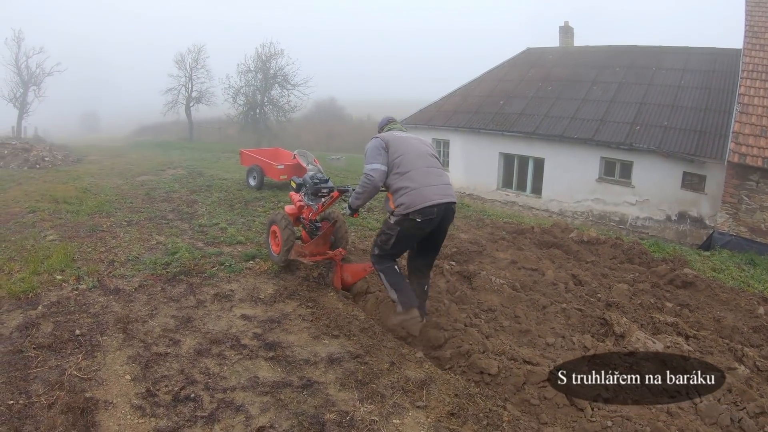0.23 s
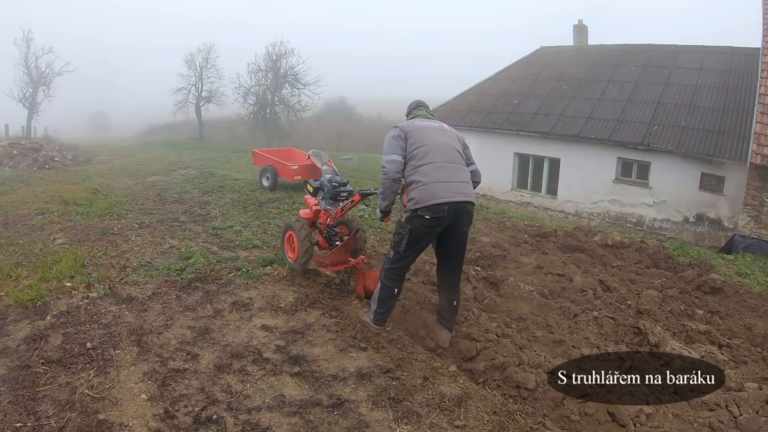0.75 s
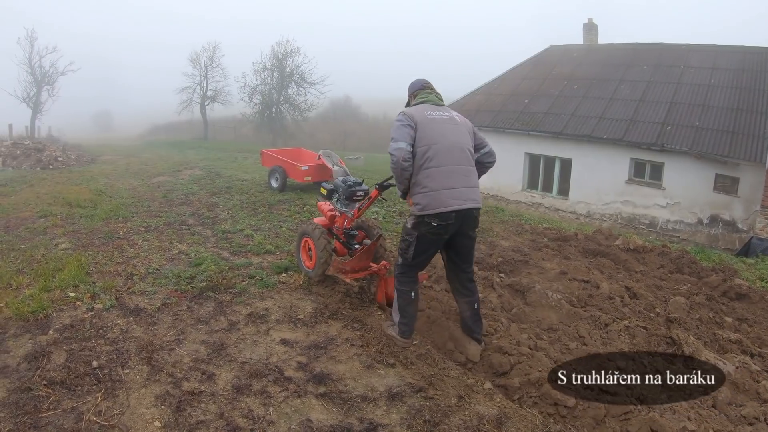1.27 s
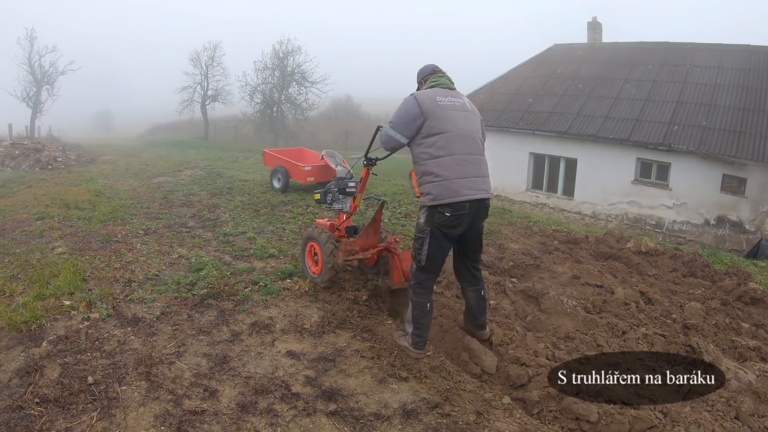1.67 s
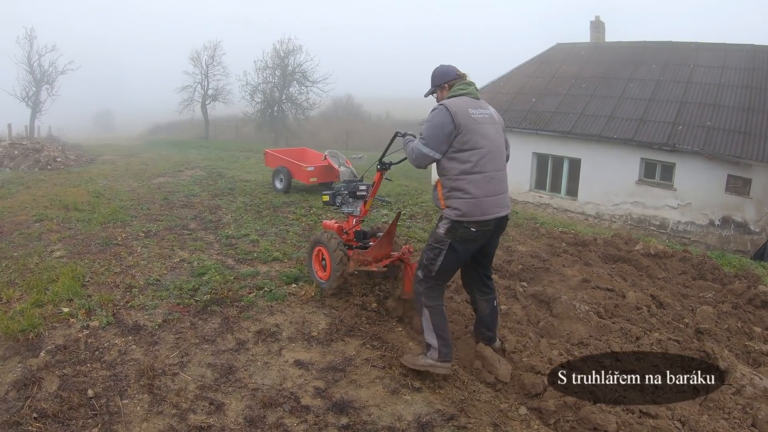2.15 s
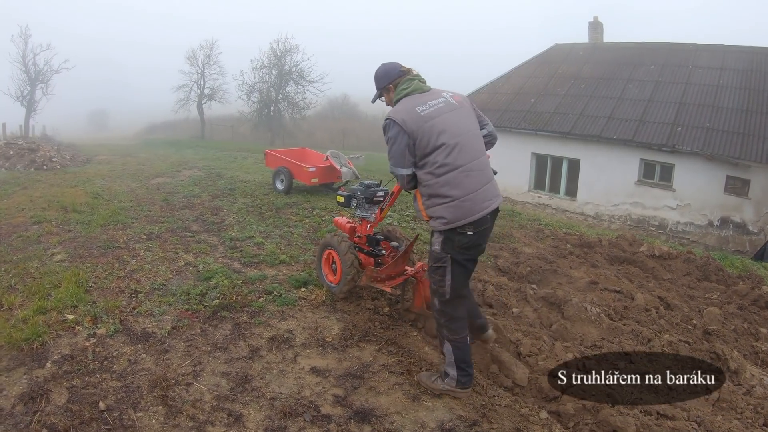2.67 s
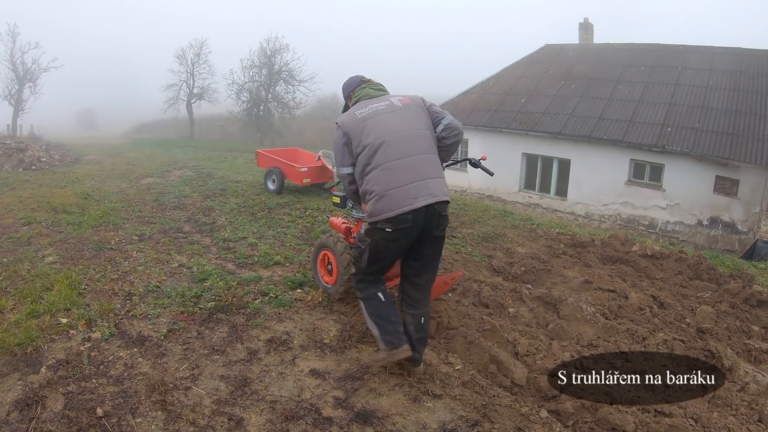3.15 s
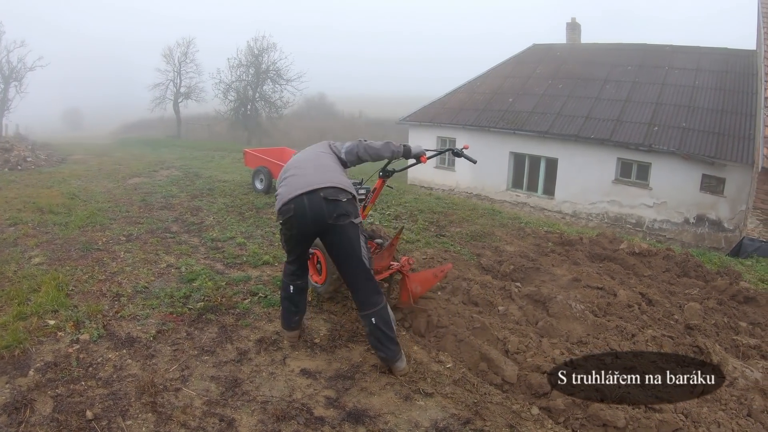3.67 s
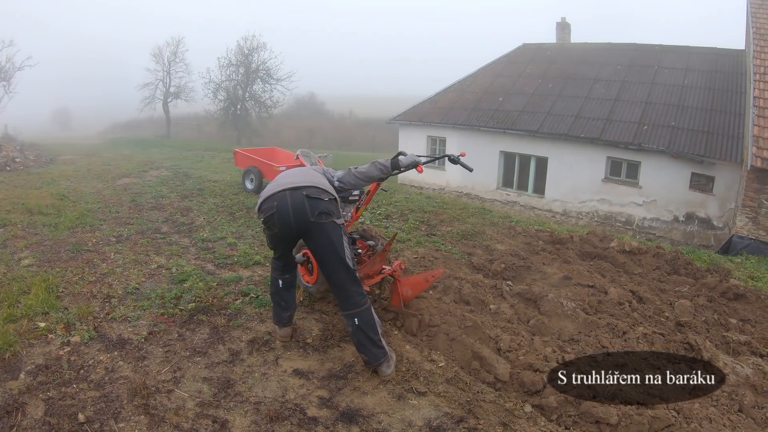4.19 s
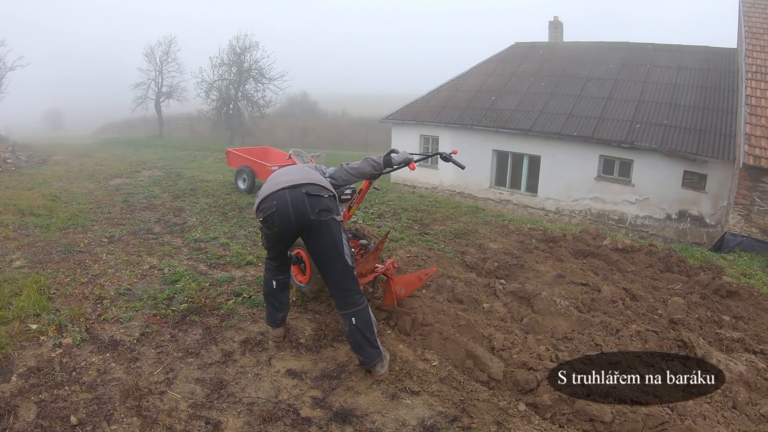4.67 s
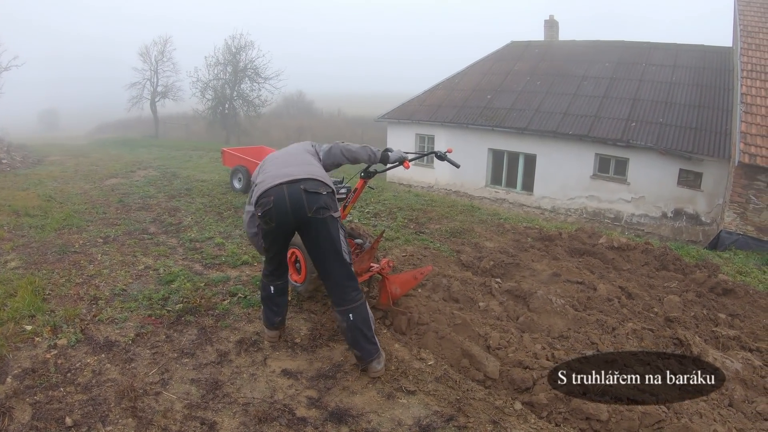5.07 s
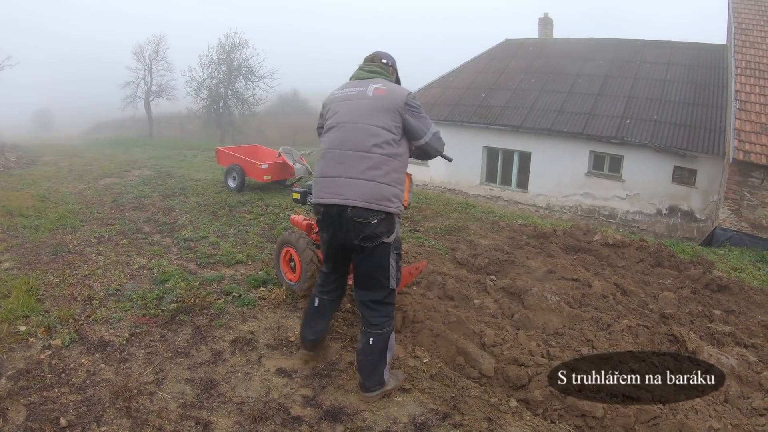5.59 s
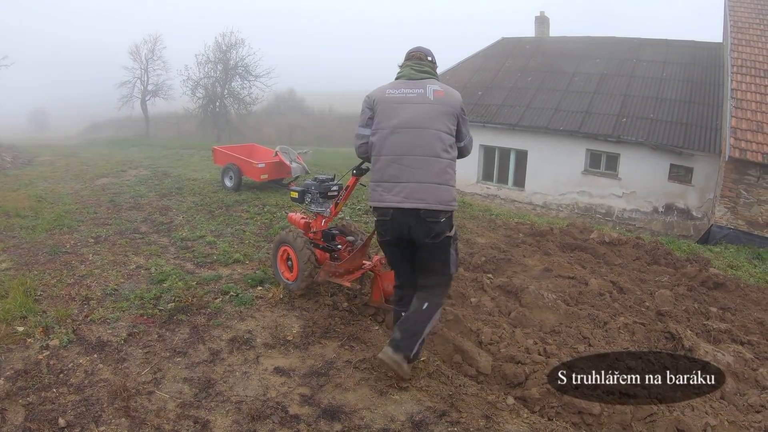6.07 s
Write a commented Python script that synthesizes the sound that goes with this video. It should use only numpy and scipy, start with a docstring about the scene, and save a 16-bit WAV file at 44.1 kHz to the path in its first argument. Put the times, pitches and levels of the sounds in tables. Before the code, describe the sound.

A one-cylinder walking tractor runs a few metres away in an open field, centred in front of the microphone. It starts loud, pulling hard with a barking intake. At about 0.6 seconds the throttle snaps shut and the engine coasts down, reaching a chugging idle soon after 1 second. From roughly 0.9 to 1.6 seconds loose steel rattles, stones tick and the plough scrapes briefly through gritty soil. A loose cover clacks quickly from 1.8 to 3 seconds, then more faintly and sporadically. The idle continues to the end, with exhaust thumps, rhythmic hiss and mechanical knocking. Between 3 and 6 seconds the knock and hiss are muffled while the low thump stays, with two small dry ticks around 4 and 4.5 seconds. The engine brightens again near 6 seconds. Light wind rumbles on the microphone throughout in small gusts.

```python
"""A one-cylinder four-stroke walking tractor, a few metres from a stereo microphone in a field.
It opens pulling hard, the intake barking; at 0.6 s the throttle snaps shut and the engine coasts down.
From about 1 s loose steel rattles and the ploughshare scrapes the soil, then a cover starts to clack.
The engine chugs on at idle: each cycle the pipes thump, gas hisses out and the valve gear knocks.
From 3 s to 6 s the operator screens the knock and hiss. Light wind rumbles on the microphone throughout."""
import sys
import numpy as np
from scipy import signal
from scipy.fft import rfft, irfft
from scipy.io import wavfile

SR = 44100
rng = np.random.default_rng(int(sys.argv[2]) if len(sys.argv) > 2 else 0)


def pcm_store(signal):
    """Save signal as 16-bit PCM."""
    levels = np.round(np.clip(np.atleast_2d(signal), -1, 1) * 32767)
    wavfile.write(sys.argv[1], SR, levels.astype(np.int16).T)


N = 279594
TIME = np.arange(N) / SR

# The crankshaft. Each row: time in seconds, speed in revolutions per minute.
CRANK_SPEED = [(0, 3069.8), (.2, 3024.7), (.37, 3300), (.58, 3358.3), (.63, 2925.8), (.74, 2928.7),
               (.9, 2030.9), (.96, 2053.7), (1.51, 1845.6), (2.04, 1717.1), (2.09, 1714.2), (2.67, 1745.6),
               (3.01, 1783.6), (3.29, 1763), (3.97, 1662.1), (5.13, 1660.8), (5.68, 1672.2), (5.81, 1604.2),
               (6.4, 1632.7)]
def firings():
    """Firing times in seconds, one every two crank turns, with two spare at each end."""
    cycles = np.cumsum(in_time(CRANK_SPEED)[0]) / (120 * SR) - .169   # first firing .169 of a cycle in
    t = np.interp(np.arange(int(cycles[-1]) + 1), cycles, TIME)
    before = t[0] - (t[1] - t[0]) * np.array([2, 1])
    after = t[-1] + (t[-1] - t[-2]) * np.array([1, 2])
    return np.r_[before, t, after]

# The throttle. Each row: time in seconds, opening from 0 to 1.
THROTTLE = [(0, 1), (.6, 1), (.66, .35), (.78, .02), (6.34, .02)]
# Pull on the plough, and the engine turned from the microphone behind the operator.
# Each row: time in seconds, change in dB before weighting.
EFFORT = [(0, -7), (.13, -5), (.25, -3), (.36, -1), (.47, -3.3), (.6, -5)]
SCREENING = [(0, 1), (2.0, 0.5), (2.9, -1), (3.12, -8.5), (3.35, -6.5), (3.8, -4), (4.1, -5.5), (5.55, -9),
             (5.85, -4), (6.1, -3), (6.34, -0.5)]
def loudness(law):
    """Gain of one engine layer, following speed, throttle, effort and screening."""
    # Each law: idle level in dB, dB per doubling of speed, dB at open throttle, then two weights.
    idle_db, doubling_db, throttle_db, effort_weight, screen_weight = law
    speed_db = doubling_db * np.log2(in_time(CRANK_SPEED)[0] / 1700)   # idle is 1700 rpm
    load_db = in_time(THROTTLE)[0] * (throttle_db + effort_weight * in_time(EFFORT)[0])
    return amp(idle_db + speed_db + load_db + screen_weight * in_time(SCREENING)[0])

# Valve puffs in the pipes. Each row: place in the cycle from 0 to 1, delay in ms, resonance in Hz,
# swell time in ms, relative level in dB, push (+) or suck (-), scatter in dB.
EXHAUST_IDLE = [(0, .5, 134, 2.3, 17.5, 1, .7)]
INTAKE_IDLE = [(.283, -3.7, 65, 2.6, 11.5, -1, .7), (.283, .4, 145, 2.3, 7, -1, 1),
               (.69, -.3, 111, 2.9, 1, 1, 1.5)]
SILENCER_RING = [(0, -.8, 525, 2.3, 12, 1, 2), (0, .3, 601, 2.4, 10.5, 1, 2)]
PIPES_LOAD = [(0, -.8, 106, 2, 17, 1, .4), (.25, 0, 94, 1.8, 16, -1, .4), (.585, 0, 173, 1.2, 10, 1, .7)]
INTAKE_BARK = [(.212, 0, 465, 1.3, 19, 1, .6), (.38, 0, 703, 1.2, 8, 1, 1), (.585, 0, 373, 1, 16.5, 1, .8),
               (.865, 0, 583, 1.9, 6.5, 1, 1)]
COAST_PUFF = [(0.0032, -0.8, 61, 2.1, 21.3, 0.86, .7)]
# Uneven firings. Each row: time in seconds, change of strength in dB.
UNEVEN_FIRINGS = [(.731, 2), (.772, -1.5), (.819, -3), (.87, -0.5), (.928, -4), (3.388, -4), (4.745, -3),
                  (5.323, -7.5), (5.756, -7)]
# Throttle snapped shut, nothing firing. Each row: time in seconds, share of coasting from 0 to 1.
COASTING = [(0, 0), (.625, 0), (.64, 1), (.71, 1), (.76, 0), (6.34, 0)]
# Level laws, as read by loudness().
THUMP_LAW = (-33, 0.6, 7, 0.26, -0.01)
RING_LAW = (-44.5, 1, 10, .1, -0.26)
BARK_LAW = (-55, 3, 19.5, 1.3, 0)
def pipes(fire, opening):
    """Exhaust and intake bark under load, pump unburnt air while coasting and thump at idle."""
    uneven_db, even_db = np.zeros((2, len(fire)))
    for s, db in UNEVEN_FIRINGS:
        uneven_db[np.argmin(abs(fire - s))] = db
    thump = loudness(THUMP_LAW)
    idle = thump * (puffs(fire, EXHAUST_IDLE, uneven_db) + puffs(fire, INTAKE_IDLE, even_db))
    idle += loudness(RING_LAW) * puffs(fire, SILENCER_RING, .58 * uneven_db)
    load = thump * puffs(fire, PIPES_LOAD, even_db)
    load += loudness(BARK_LAW) * puffs(fire, INTAKE_BARK, even_db) + growl(fire)
    pumped = thump * puffs(fire, COAST_PUFF, even_db)
    coasting = in_time(COASTING)[0]
    return (1 - coasting) * (opening * load + (1 - opening) * idle) + coasting * pumped

def puffs(fire, table, strength_db):
    """Each valve opening swells and dies in one pipe resonance."""
    out = 0
    for share, delay_ms, hz, swell_ms, level_db, sign, scatter_db in table:
        age, cycle = since(fire, share, delay_ms)
        level_luck, pitch_luck = rng.standard_normal((len(fire), 2))[cycle].T
        swell = age * 1000 / swell_ms
        gain = sign * amp(level_db + strength_db[cycle] + scatter_db * level_luck)
        tone = np.sin(2 * np.pi * hz * (1 + .012 * pitch_luck) * age)
        out += gain * swell ** 2 * np.exp(-swell) * tone
    return out

# Modes of the long pipe. Each row: pitch in Hz, width in Hz, relative level in dB.
PIPE_MODES = [(342, 11, 0.5), (422.4, 12, 2), (498, 27, -1), (584, 19, -3), (721, 12, -6)]
GROWL_LAW = (-57, 3, 25.5, 1, 0)
def growl(fire):
    """One sharp blow, about 8 ms after each firing, sets the long pipe ringing."""
    blows = np.zeros(N)
    at = fire[(fire > 0) & (fire < TIME[-1])] + .00813
    blows[(at * SR).astype(int)] = amp(.6 * rng.standard_normal(len(at)))
    return loudness(GROWL_LAW) * through(blows + 1e-18, PIPE_MODES)

# One spit a cycle under load. Each row: place in the cycle from 0 to 1, relative level in dB,
# decay as a share of the cycle, scatter in dB.
LOAD_SPIT = [(-0.038, 0, 0.13, 2.1)]
def spit(fire, opening):
    """Envelope shared by knock, hiss and suction: under load each firing spits hard."""
    return opening * bursts(fire, LOAD_SPIT, between_db=-16, rise_ms=4.7)

# Valve gear knocks at idle, rows as in LOAD_SPIT.
KNOCKS = [(0, 2, 0.021, 3.5), (.2, -0.7, 0.077, 4.5), (0.279, -2, 0.03, -12.5), (.57, -12, 0.076, 3.5),
          (.76, 1.5, 0.087, 1.5)]
# Modes of the casing. Each row: pitch in Hz, width in Hz, relative level in dB.
CASING_MODES = [(723, 4.7, -15.5), (983, 190, 4), (1227, 30, 3), (1385, 130, 1), (1680, 86, 0),
                (1857, 89, 1.5), (2480, 31, -12)]
CASING_LAW = (-45.5, 14.5, -1, 0, 0.69)
def valve_gear(fire, opening, blast):
    """The valve gear knocks at fixed crank angles and rings the casing."""
    idle = (1 - opening) * bursts(fire, KNOCKS, between_db=-10.5, rise_ms=2.8)
    knock = loudness(CASING_LAW) * (blast + .37 * opening + idle)
    ringing = [through(knock * white(), CASING_MODES) for _ in range(2)]
    return np.sqrt(np.mean(knock ** 2)) * stereo(*ringing, side_db=-50)

# Gas let out at idle, rows as in LOAD_SPIT.
BLOWS = [(-.02, 7, 0.053, 5.6), (.24, 1.2, 0.2, 3)]
# The hiss from a few metres. Each row: frequency in Hz, relative density in dB.
HISS_SPECTRUM = [(1060, -73), (1800, 5), (2300, -3), (2720, -2), (3580, -4.5), (3910, -3), (4300, -5.5),
                 (5840, -11), (7500, -21.5), (9750, -56), (16500, -120)]
# Thin covers and fins. Each row: pitch in Hz, width in Hz, relative level in dB.
COVER_MODES = [(2686, 440, 3), (3373, 170, -2), (3600, 340, -3.5), (4633, 150, -3), (5260, 220, -5.5),
               (5950, 170, -4.5), (6440, 89, -11), (9150, 1600, -8.5), (14300, 680, -15)]
HISS_LAW = (-51.5, 12, 9.5, 1.1, 0.86)
def gas_hiss(fire, opening, blast):
    """Gas hisses out every cycle, coloured by the covers and fins."""
    idle = (1 - opening) * bursts(fire, BLOWS, between_db=-7.5, rise_ms=2.1)
    gas = [coloured(HISS_SPECTRUM) + .8 * through(white(), COVER_MODES) for _ in range(2)]
    return loudness(HISS_LAW) * (blast + idle) * stereo(*gas, side_db=-38.5)

# Air drawn in at idle, rows as in LOAD_SPIT.
SUCKS = [(-.02, 0.39, 0.33, 10), (.32, 16, 0.059, 1.1)]
# The rushing air. Each row: frequency in Hz, relative density in dB.
AIR_SPECTRUM = [(2940, -16), (5000, 3.5), (5870, -8), (6760, -2), (8170, -8.5), (12900, -9), (14200, -37),
                (14700, -9), (16000, -23)]
# Modes of the air box. Each row: pitch in Hz, width in Hz, relative level in dB.
AIR_BOX_MODES = [(7580, 380, -3), (8100, 70, -4), (8500, 450, -3.5), (11000, 1200, -6), (14600, 500, -16)]
# The air box swings towards the microphone. Each row: time in seconds, gain in dB.
INTAKE_FACING = [(0, -2), (5.6, 2.5), (5.85, 4.5), (6.34, 2.5)]
SUCK_LAW = (-60, 13.5, 12, 1.27, 0.77)
def suction(fire, opening, blast):
    """The intake sucks bright gulps of air through its box."""
    idle = (1 - opening) * bursts(fire, SUCKS, between_db=0, rise_ms=1.3)
    air = [coloured(AIR_SPECTRUM) + .77 * through(white(), AIR_BOX_MODES) for _ in range(2)]
    gain = loudness(SUCK_LAW) * amp(in_time(INTAKE_FACING)[0])
    return gain * (blast + idle) * stereo(*air, side_db=-22.5)

# Air through the throttle. Each row: frequency in Hz, relative density in dB.
ROAR_SPECTRUM = [(270, -16), (350, -4), (420, 0), (560, -5), (730, -3), (820, -14), (1200, -22)]
ROAR_LAW = (-55.5, 21.5, -1, -1.03, 0.9)
def intake_roar():
    """Air roars through the throttle, far louder at high engine speed."""
    return loudness(ROAR_LAW) * coloured(ROAR_SPECTRUM)

# A loose cover on the engine. Each row: start in seconds, relative level in dB.
CLACKS = [(1.7888, -28), (1.874, -29), (2.0808, -25), (2.155, -28.5), (2.227, -31), (2.2925, -27),
          (2.361, -24), (2.437, -29.5), (2.4998, -23), (2.5707, -24.5), (2.641, -27.5), (2.707, -24),
          (2.776, -24), (2.845, -29.5), (2.9771, -34), (3.3204, -32), (3.5242, -33.5), (3.5936, -32.5),
          (3.7349, -31.5), (3.879, -34), (4.0925, -44), (5.246, -36.5), (5.3924, -36.5), (6.2977, -42)]
def cover_clacks(rise_s=.00074, decay_s=.012, gain_db=-9.5):
    """The cover slaps in short bursts of noise with its own ringing colour."""
    envelope, age = np.zeros(N), np.arange(3000) / SR
    shape = np.exp(-age / decay_s) * (1 - np.exp(-age / rise_s))
    for s, db in CLACKS:
        add_at(envelope, s, amp(db + gain_db) * shape)
    return envelope * (through(white(), COVER_MODES) + .35 * coloured(HISS_SPECTRUM))

# Jolts as the machine is moved. Each row: start in seconds, strike level in dB.
JOLTS = [(0.8909, -30.5), (1.0297, -29.5), (1.0735, -35), (1.1104, -49), (1.152, -33), (1.2331, -25.5),
         (1.3484, -20), (1.3754, -28), (1.416, -38), (1.4666, -37), (1.516, -28), (1.5707, -27),
         (1.6038, -38), (1.634, -33.5)]
# Modes of the loose steel. Each row: pitch in Hz, gain in dB, seconds to fall by 60 dB.
STEEL_MODES = [(3220, -18, 0.033), (4092, -2, 0.036), (4760, -20, .03), (6100, -16, .04),
               (6700, -12, 0.023), (7160, -19, .04), (8600, -32, .03)]
def steel_rattle(chatter_db=-24, chatter_s=.0015):
    """Each jolt strikes a loose steel part, which chatters briefly; both drive all its modes."""
    out, force, age = np.zeros(N), np.full(N, 1e-18), np.arange(1500) / SR
    for s, db in JOLTS:
        jolt = np.r_[1, amp(chatter_db) * rng.standard_normal(1499)]
        add_at(force, s, amp(db) * jolt * np.exp(-age / chatter_s))
    for hz, db, t60 in STEEL_MODES:
        r, w = amp(-60 / (t60 * SR)), 2 * np.pi * hz / SR
        out += amp(db) * signal.lfilter([0, np.sin(w)], [1, -2 * r * np.cos(w), r * r], force)
    return out

# Stones and levers. Each row: start in seconds, level in dB, pitch in Hz, width in Hz, decay in ms.
TICKS = [(1.041, -31.5, 3080, 700, 11), (1.154, -35.5, 7070, 600, 4), (1.228, -29, 6300, 2180, 7.4),
         (1.472, -28, 4600, 1500, 3.4), (3.98, -33, 940, 2180, 7.4), (4.456, -37, 4500, 2130, 3.7),
         (5.777, -51, 1700, 1500, 6.2)]
def ticks():
    """Dry knocks of stones and levers: short dying noise around one pitch."""
    out, age = np.zeros(N), np.arange(4000) / SR
    for s, db, hz, width_hz, decay_ms in TICKS:
        band = resonate(rng.standard_normal(4000), hz, width_hz)
        band = rms_one(resonate(band, hz, width_hz))
        add_at(out, s, amp(db) * band * np.exp(-age * 1000 / decay_ms))
    return out

# The ploughshare down in the soil. Each row: time in seconds, relative level in dB.
SCRAPE_LEVEL = [(1.12, -52), (1.17, -42.5), (1.21, -40), (1.24, -38.5), (1.37, -37.5), (1.4, -45),
                (1.5, -42.5), (1.65, -68)]
def plough_scrape():
    """The share grinds through gritty soil and sets the steel singing faintly."""
    grit = coloured([(700, -2), (1500, -2.5), (3300, -2), (7300, -17), (9000, -24), (15000, -35)])
    grit *= amp(2.4 * drift(34))
    sing = sum(amp(db) * rms_one(resonate(grit, hz, 90)) for hz, db, _ in STEEL_MODES)
    return amp(in_time(SCRAPE_LEVEL)[0]) * (grit + .4 * sing)

# The drone behind the engine. Each row: frequency in Hz, relative density in dB.
DRONE_SPECTRUM = [(60, -3), (100, 0), (150, -2), (250, -12), (290, -17), (350, -10), (550, -13), (750, -18),
                  (1200, -24), (2600, -40)]
# Its level at the microphone. Each row: time in seconds, level in dB.
DRONE_LEVEL = [(0, -41), (.6, -41), (1, -44), (6.34, -45)]
def drone():
    """Low noise stands for the shaking frame and the echoes off ground and walls."""
    rumble = stereo(coloured(DRONE_SPECTRUM), coloured(DRONE_SPECTRUM), side_db=-49)
    return amp(in_time(DRONE_LEVEL)[0]) * rumble

# Gusts right on the microphone. Each row: crest time in seconds, level in dB, half-width in seconds.
GUSTS = [(.3, -29, .15), (0.586, -25, 0.047), (0.854, -33, 0.29), (1.197, -33, .04), (1.31, -29, 0.044),
         (1.455, -25, 0.035), (1.974, -25.5, 0.068), (2.183, -23.5, 0.037), (2.6, -40, .15),
         (3.45, -38.5, 0.07), (3.76, -32, 0.018), (4.15, -28.5, 0.023), (4.54, -26, 0.053),
         (4.712, -28, 0.022), (4.893, -21, .03), (5.03, -28.5, .04), (5.325, -26.5, 0.033),
         (5.776, -30, 0.05), (6.002, -33, 0.089)]
def wind(breeze_db=-37, lumps_db=2.5):
    """A light breeze and swelling gusts buffet the microphone with a lumpy low rumble."""
    power = amp(breeze_db - lumps_db * drift(13)) ** 2
    for s, db, half_width in GUSTS:
        power += amp(db) ** 2 * np.exp(-((TIME - s) / half_width) ** 2)
    rumble = coloured([(6, -4), (14, 6), (30, -9), (55, -12.5), (110, -49), (250, -26.5)])
    return np.sqrt(power) * rumble

def since(fire, share, delay_ms=0):
    """Seconds since the cam last passed this share of the cycle, and the number of that cycle."""
    at = fire[:-1] + share * np.diff(fire) + delay_ms / 1000
    cycle = np.searchsorted(at, TIME) - 1
    return TIME - at[cycle], cycle

def bursts(fire, table, between_db, rise_ms):
    """Envelope of bursts at fixed crank angles over a steady part; rms 1."""
    out = amp(between_db)
    for share, level_db, decay, scatter_db in table:
        age, cycle = since(fire, share)
        luck = np.clip(rng.standard_normal(len(fire)), -2, 1.5)[cycle]
        rise = 1 - np.exp(-age * 1000 / rise_ms)
        fall = np.exp(-age / np.diff(fire)[cycle] / decay)
        out = out + amp(level_db + scatter_db * luck) * rise * fall
    return rms_one(out)

def resonate(x, hz, width_hz):
    """One band-pass resonance."""
    r = np.exp(-np.pi * width_hz / SR)
    poles = [1, -2 * r * np.cos(2 * np.pi * hz / SR), r * r]
    return signal.lfilter([(1 - r * r) / 2, 0, (r * r - 1) / 2], poles, x)

def through(x, modes):
    """Parallel resonances, signs alternating; rms 1."""
    return rms_one(sum((-1) ** k * amp(db) * rms_one(resonate(x, hz, width_hz))
                       for k, (hz, width_hz, db) in enumerate(modes)))

def coloured(spectrum):
    """Noise of rms 1 shaped by (Hz, dB) points, falling away outside them."""
    hz, db = np.transpose(spectrum)
    log_hz = np.log(np.fft.rfftfreq(N, 1 / SR) + 1)
    gain = amp(np.interp(log_hz, np.log(hz), db, -90, -90))
    return rms_one(irfft(rfft(white()) * gain, N))

def drift(hz):
    """Slow random wander of spread 1."""
    return coloured([(hz / 10, 0), (hz, 0), (hz * 10, -40)])

def stereo(mid, side, side_db):
    """Left and right share the mid signal and differ by a faint side signal."""
    return mid + amp(side_db) * side * np.array([[1], [-1]])

def in_time(rows):
    """One curve per column after the time, interpolated to every sample."""
    s, *columns = np.transpose(rows)
    return [np.interp(TIME, s, c) for c in columns]

def add_at(track, s, sound):
    start = round(s * SR)
    track[start:start + len(sound)] += sound[:N - start]

def white():
    return rng.standard_normal(N)

def amp(db):
    return 10 ** (np.asarray(db) / 20)

def rms_one(x):
    return x / np.sqrt(np.mean(x ** 2) + 1e-20)

def scene():
    """The tractor almost dead centre, a few metres off, with wind on the microphone."""
    fire, opening = firings(), in_time(THROTTLE)[0]
    blast = spit(fire, opening)
    engine = valve_gear(fire, opening, blast) + gas_hiss(fire, opening, blast)
    engine += suction(fire, opening, blast) + pipes(fire, opening) + intake_roar()
    return engine + cover_clacks() + steel_rattle() + ticks() + plough_scrape() + drone() + wind()

def record(dry):
    """The recorder cuts the top steeply, 70 dB down from 16 kHz."""
    return signal.sosfilt(signal.cheby2(16, 70, 16000, fs=SR, output="sos"), dry)

dry = scene()
out = record(dry)
pcm_store(out)
```